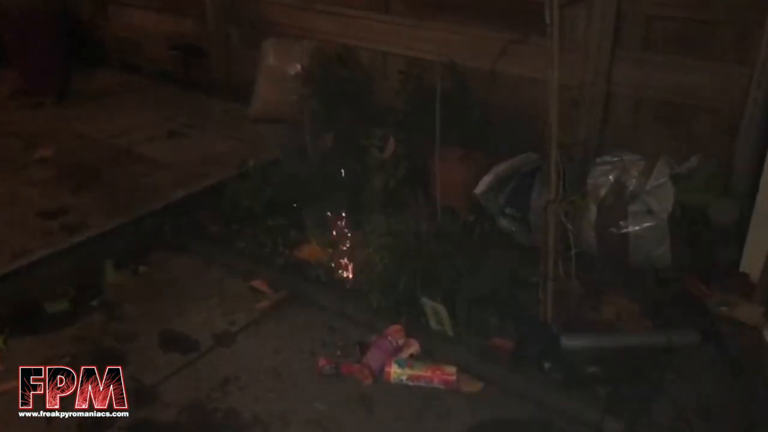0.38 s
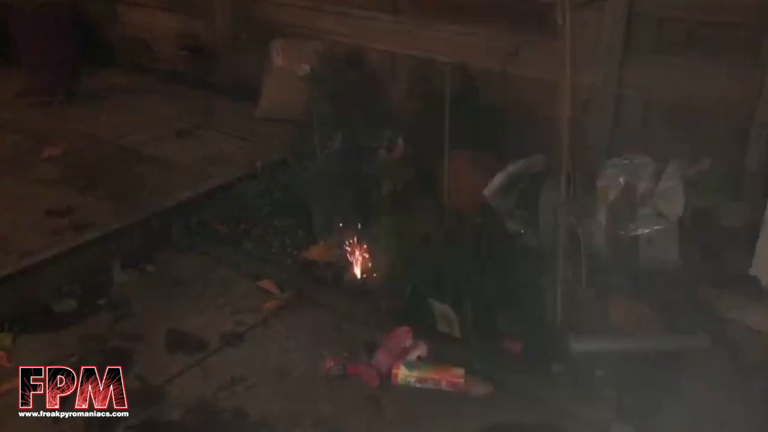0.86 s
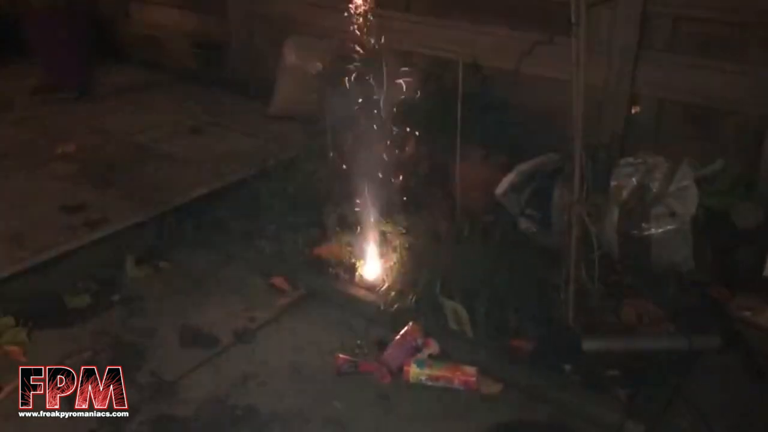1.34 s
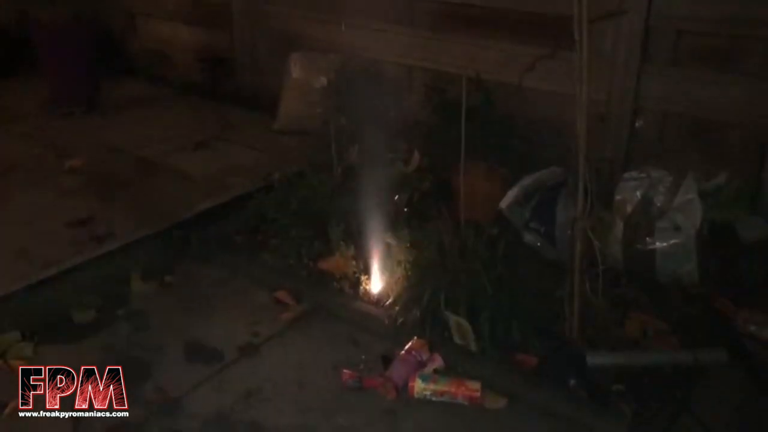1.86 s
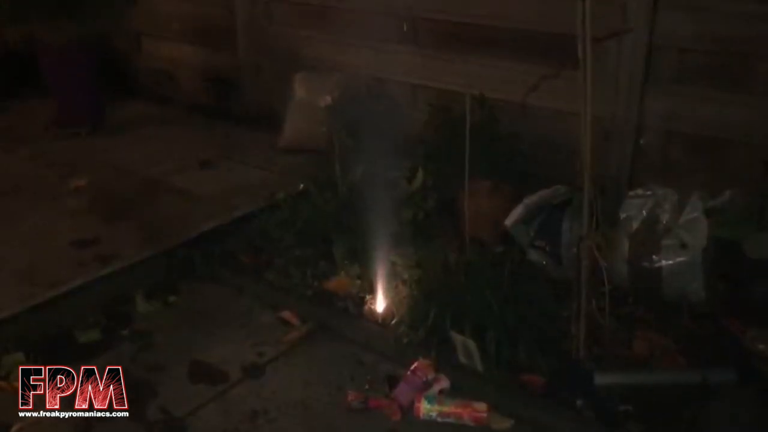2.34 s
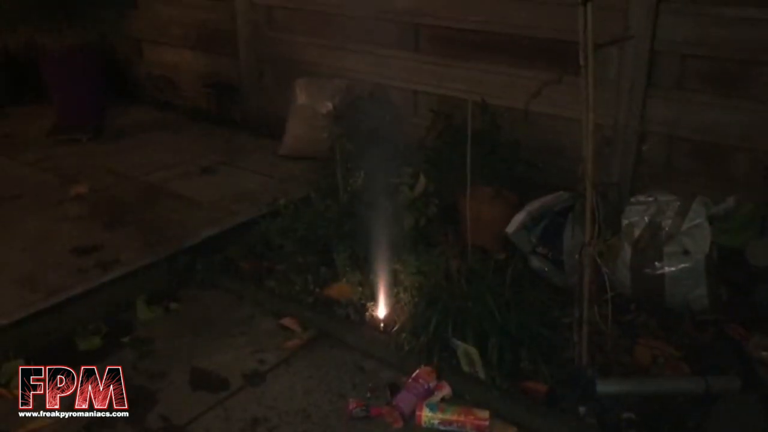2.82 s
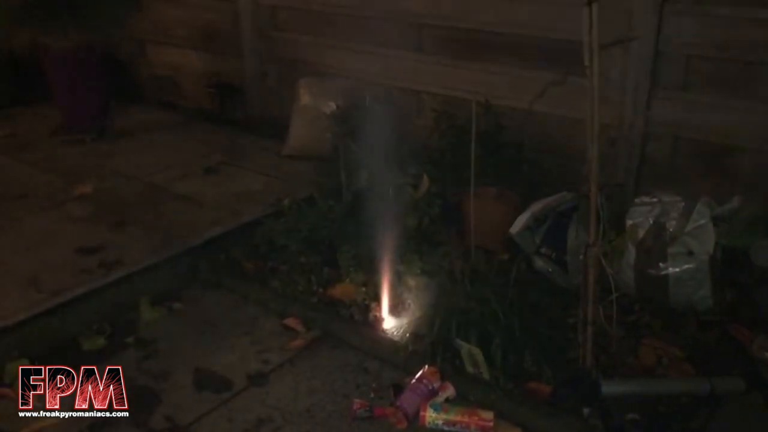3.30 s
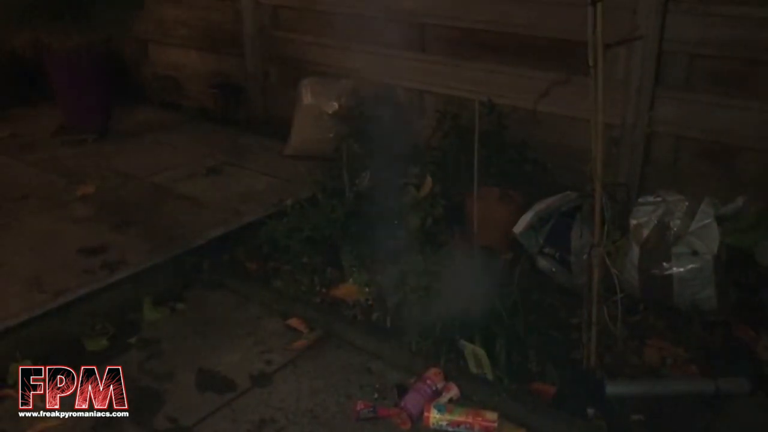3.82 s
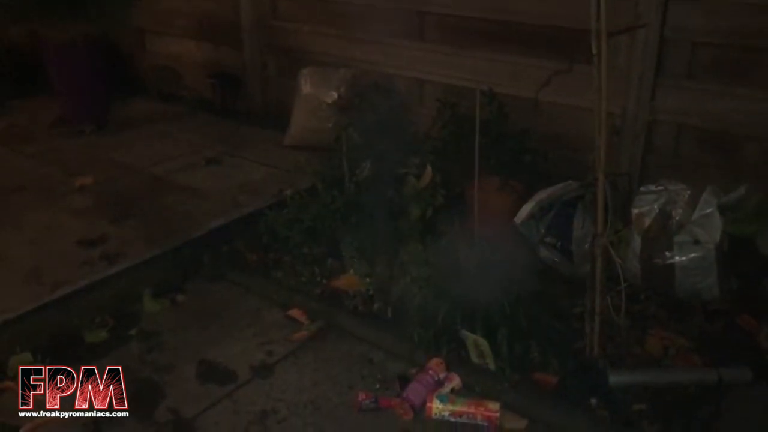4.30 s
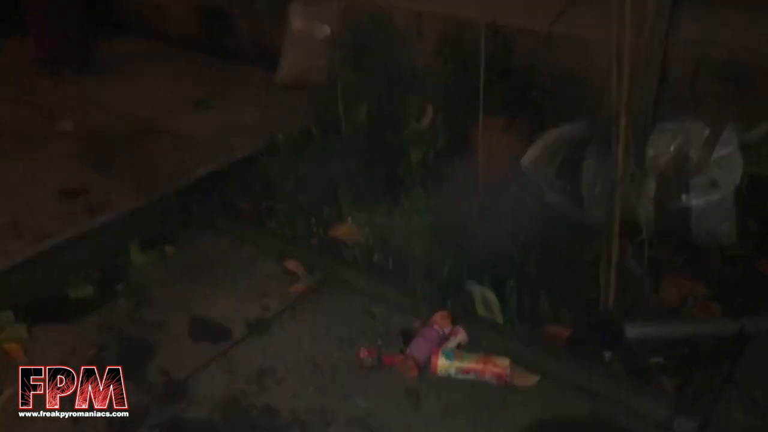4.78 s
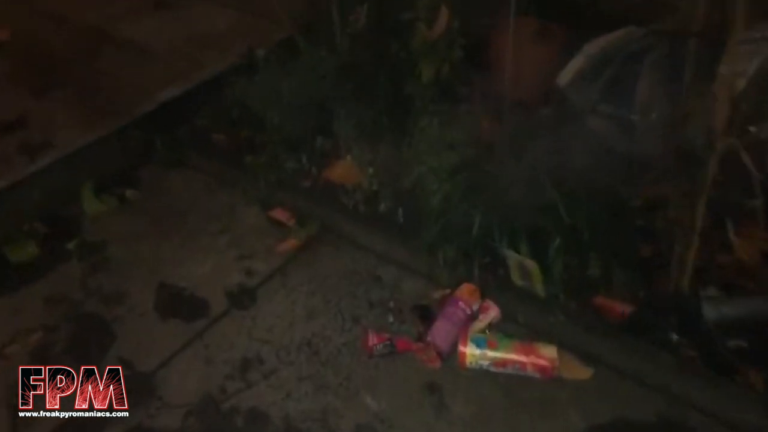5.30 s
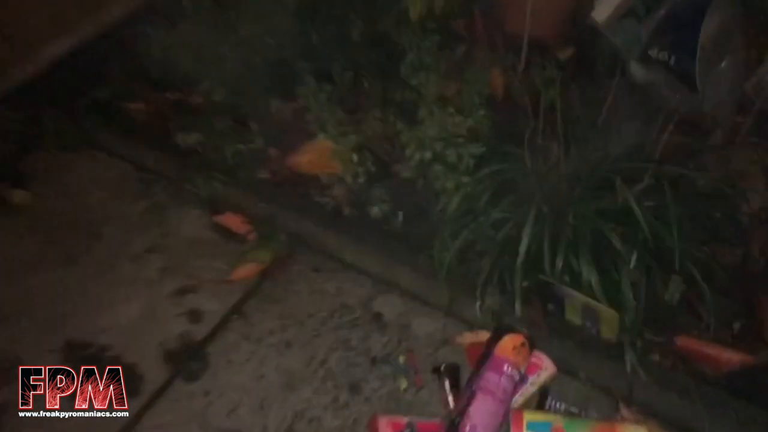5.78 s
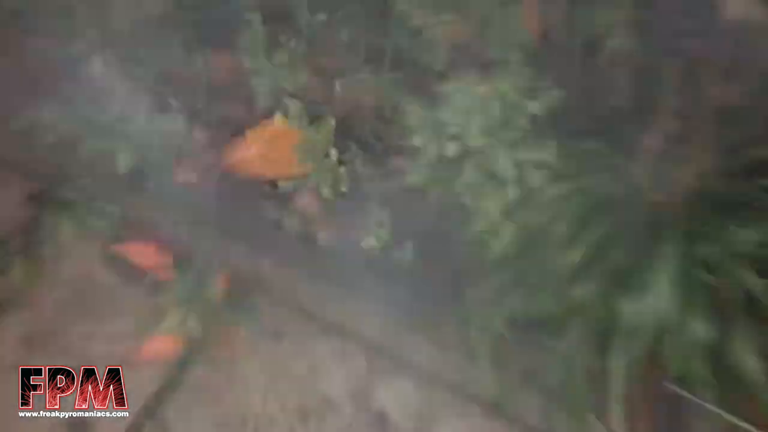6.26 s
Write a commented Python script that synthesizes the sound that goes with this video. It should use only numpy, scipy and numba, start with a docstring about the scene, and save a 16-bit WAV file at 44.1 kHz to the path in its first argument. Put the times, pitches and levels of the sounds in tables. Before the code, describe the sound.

A paved, fenced yard at night, heard through a handheld recorder with automatic gain and dulled top treble. From 0 to 1.2 s a fuse fizzes and spits thinly, with a hollow tube resonance rising slightly, over faint low traffic. At 1.2 s the charge catches with a small pop and a very loud, piercing whistle near 4.7 kHz, rich in overtones, rough and wrapped in jet hiss. It slides down to about 3 kHz by 2.1 s, where it sputters briefly, bottoms around 2.65 kHz at 2.7 s, then climbs to about 4.2 kHz and dies quickly near 3.75 s, with short dense echoes. Near silence follows; background slowly returns, with a faint thin high tone from 4 to 4.9 s and a swelling traffic drone. From 4.9 s footsteps approach: dull thuds, a scrape at 5.6 s, and sharper grit crunches around 6.0 to 6.4 s.

```python
"""A paved yard at night: a small ground firework fizzes on its fuse, resonant in its card tube, then the charge
whistles as a gliding harmonic stack with jet hiss and two sputters. Fences return dense noise-like echoes.
The recorder's gain control ducks and creeps back; a faint thin tone, probably a trace of the recorder's
processing, stops as footsteps begin: the holder walks up over gritty slabs, soles thudding, dragging and
cracking grit. Far off, traffic drones in a narrow band of noise."""
import sys
import numpy as np
from scipy import signal
from scipy.fft import rfft, irfft
from scipy.io import wavfile
from scipy.ndimage import uniform_filter1d, minimum_filter1d
from numba import njit

SR = 44100
rng = np.random.default_rng(int(sys.argv[2]) if len(sys.argv) > 2 else 0)


def voltage_ratio(level):
    """Linear amplitude factor for a level in decibels (scalar or array-like)."""
    return 10 ** (np.asarray(level, float) / 20)


def store_pcm(level_fs):
    """Save levels as 16-bit WAV."""
    pcm = np.round(np.clip(level_fs, -1, 1) * 32767).astype(np.int16)
    wavfile.write(sys.argv[1], SR, np.atleast_2d(pcm).T)


N = 281799
TIME = np.arange(N) / SR
CATCH_S = 0.0022  # how quickly the charge catches, and a sputter sets in


def level(x, db):
    """Scale to an rms level."""
    return x * voltage_ratio(db) / np.sqrt(np.mean(x ** 2))


def columns(table):
    """Each column of a curve table after the first, one value per sample."""
    s, *rest = np.transpose(table)
    return [np.interp(TIME, s, c) for c in rest]


def span(table, fade_s=.004):
    """1 while a table lasts, with short fades outside it."""
    into = TIME - table[0][0] + fade_s
    left = table[-1][0] + fade_s - TIME
    return np.clip(np.minimum(into, left) / fade_s, 0, 1)


def walk(rate):
    """Random levels held 1 / rate s and slewed twice; spread near 1."""
    k = int(SR / rate)
    held = np.repeat(rng.standard_normal(N // k + 1), k)
    return 1.3 * uniform_filter1d(uniform_filter1d(held, k), k)[:N]


def colour(x, points):
    """Shape a sound by (Hz, dB) points; rms 1."""
    hz, db = np.transpose(points)
    bins = np.arange(N // 2 + 1) * SR / N + 1
    gain = voltage_ratio(np.interp(np.log(bins), np.log(hz), db))
    return level(irfft(rfft(x) * gain, N), 0)


def crackle(per_s, spread_db):
    """Noise sprinkled with sharp grains of very uneven size; rms 1."""
    size = voltage_ratio(spread_db * np.minimum(rng.exponential(size=N), 5.5))
    grains = (rng.random(N) < per_s / SR) * size * rng.standard_normal(N)
    return level(rng.standard_normal(N) + uniform_filter1d(grains, size=3), 0)


@njit
def svf(x, hz, width):
    """Moving state-variable band-pass, gain 1 at the centre; hz per sample, width in Hz."""
    y, b, l = np.empty(len(x)), 0., 0.
    for i in range(len(x)):
        g, k = np.tan(np.pi * hz[i] / SR), width / hz[i]
        v = (b + g * (x[i] - l)) / (1 + g * (g + k))
        b, l, y[i] = 2 * v - b, l + 2 * g * v, k * v
    return y


def band(x, hz, width):
    """Two moving band-passes in a row."""
    return svf(svf(x, hz, width), hz, width)


def ring(s, db, hz, cycles):
    """One damped blip that builds over half a cycle; db is its level before build-up and decay."""
    turns = np.clip(TIME - s, 0, None) * hz
    return voltage_ratio(db) * np.sin(2 * np.pi * turns) * np.minimum(2 * turns, 1) * np.exp(-turns / cycles)


def after(s, decay_s):
    """A quick rise to 1 at s, then dying away."""
    return np.clip(1 + (TIME - s) / CATCH_S, 0, 1) * np.exp(-np.abs(TIME - s) / decay_s)


def uneven():
    """Level and steadiness of the half-pitch lines: faint, except in spells when every other pulse differs."""
    # spells: start t/s, end t/s, level/dB at start, level/dB at end, steadiness (0-1)
    spells = [(1.213, 1.27, 1, -3, .3), (2.15, 2.5, -18, -13, .35), (2.52, 2.95, -8, -7, .75),
              (3.18, 3.63, -14, -10, .35)]
    rest_db, edge_db_per_s = -30, 600
    db, steady = np.full(N, 1. * rest_db), np.zeros(N)
    for s, end, first_db, last_db, share in spells:
        steady[TIME > s - .03] = share  # holds until the next spell
        outside = np.maximum(np.maximum(s - TIME, TIME - end), 0)
        spell_db = np.interp(TIME, [s, end], [first_db, last_db])
        db = np.maximum(db, spell_db - edge_db_per_s * outside)
    return db, steady


def whistle():
    """Pulsed burning locks to the tube: a harmonic stack, smeared half-pitch lines and jet hiss."""
    # glide of the whistle: t/s, f/Hz, level/dB of the fundamental
    glide = [(1.191, 4700, -30.5), (1.198, 4786, 21.5), (1.209, 4730, 27), (1.215, 4413, 10.5),
             (1.245, 4323, 15.5), (1.26, 4125, 14.5), (1.3, 4018, 8.5), (1.37, 3863, 12.5),
             (1.45, 3804, 11.5), (1.65, 3579, 12.5), (1.85, 3378, 13.5), (2.085, 3131, 7),
             (2.102, 3570, 8.5), (2.115, 3023, 14.5), (2.14, 2940, 8), (2.3, 2830, 11.5), (2.5, 2729, 7.5),
             (2.7, 2650, 11), (2.8, 2676, 7), (2.88, 2870, 7), (2.94, 2938, 9.5), (2.99, 3183, 5.5),
             (3.09, 3491, 15.5), (3.14, 3836, 6.5), (3.19, 3992, 0), (3.25, 4059, 5), (3.42, 4037, 6.5),
             (3.5, 4100, 14), (3.58, 4221, 8.5), (3.66, 4210, 7.5), (3.72, 4285, 0), (3.755, 4190, 5),
             (3.79, 3985, -11)]
    # overtones: multiple of the pitch, level/dB
    overtones = [(2, -2), (3, -4.5), (4, -1.5)]
    # lines from uneven pulses: multiple of the pitch, level/dB
    half_lines = [(.5, -11), (1.5, 1.5), (2.5, -0.5), (3.5, 6)]
    # spectrum of the jet hiss: f/Hz, level/dB per Hz (relative)
    jet_spectrum = [(40, -39), (100, -19.5), (250, -10.5), (700, -14), (2000, -10.5), (3500, -2.5),
                    (5500, -6), (9000, 2), (12500, 1.5)]
    # sputters of the charge: t/s, low pop's level/dB before build-up and decay, f/Hz, jet burst level/dB
    sputters = [(1.204, -12.5, 220, 0.5), (2.106, -3, 250, -3.5)]
    # overtones and jet share the burn: it catches, sags slowly, then dies out
    catch_at_s, die_from_s, die_db_per_s2 = 1.2, 3.601, 499
    over_start_db, over_sag_db_per_s, over_die = 3, 1.1, 1.3
    jet_start_db, jet_sag_db_per_s, jet_die = -5.5, 1.5, 0.72
    roar_db, roar_sag_db_per_s, roar_width_hz = -11.5, 9, 2200.
    skirt_db, skirt_ratio, skirt_width_hz = -21, 0.87, 540
    top_limit_hz, top_limit_db_per_hz = 11900, 2.1  # the recorder's top limit weakens overtones above it
    steady_pct, shaken_pct, shaken_s = .48, 1.8, 0.078  # pitch wobble, and the extra after a sputter
    burst_s = .012

    hz, db = columns(glide)
    lit = TIME - catch_at_s
    caught = 1 / (1 + np.exp(-np.clip(lit / CATCH_S, -30, 30)))
    die_db = die_db_per_s2 * np.maximum(TIME - die_from_s, 0) ** 2
    unsteady = steady_pct + shaken_pct * sum(after(row[0], shaken_s) for row in sputters)
    phase = 2 * np.pi * np.cumsum(hz * (1 + unsteady / 100 * walk(260))) / SR
    throb = voltage_ratio(2.2 * walk(60) + 1.3 * walk(170))

    tone = voltage_ratio(db) * np.sin(phase)
    over_db = over_start_db - over_sag_db_per_s * lit - over_die * die_db
    for k, part_db in overtones:
        loss_db = top_limit_db_per_hz * np.maximum(k * hz - top_limit_hz, 0)
        gain = caught * voltage_ratio(over_db + part_db - loss_db + 2.2 * walk(60))
        tone = tone + (k * hz < .45 * SR) * gain * np.sin(k * phase)

    # the strong-weak pattern keeps slipping, which smears these lines
    half_db, steady = uneven()
    slip = caught * (steady + (1 - steady) * walk(450)) * voltage_ratio(2.9 * walk(12))
    halves = slip * sum(voltage_ratio(part_db) * np.sin(k * phase) for k, part_db in half_lines)
    halves = halves * voltage_ratio(half_db - 2 * die_db)

    burst = caught * voltage_ratio(jet_start_db - jet_sag_db_per_s * lit - jet_die * die_db)
    burst = burst + sum(voltage_ratio(burst_db) * after(s, burst_s) for s, _, _, burst_db in sputters)
    jet = colour(crackle(2000, 3.), jet_spectrum) * burst * voltage_ratio(1.8 * walk(14) + 1.8 * walk(120))

    # a band of roar between the first two partials
    roar = level(band(rng.standard_normal(N), 1.5 * hz, roar_width_hz), roar_db)
    roar = caught * roar * voltage_ratio(2.5 * walk(25) - roar_sag_db_per_s * lit - die_db)

    # breathy noise just under the tone, more when it wobbles
    skirt = level(band(rng.standard_normal(N), skirt_ratio * hz, skirt_width_hz), skirt_db)
    skirt = caught * skirt * voltage_ratio(2.4 * walk(30) - die_db) * unsteady / steady_pct

    pops = sum(ring(s, pop_db, pop_hz, .6) for s, pop_db, pop_hz, _ in sputters)
    return span(glide) * (np.sqrt(2) * throb * (tone + halves) + jet + roar + skirt) + pops


def fuse():
    """Spitting gas excites two broad resonances of the card tube."""
    end_s, base_db, flare_db, flare_s = 1.3, -49.5, 11, .015  # it flares just as it ends
    # the first resonance climbs as the fuse burns in; the upper one climbs and fades
    tube_hz, tube_end_hz, tube_rise_from_s, tube_rise_s = 3580, 3920, 0.38, 0.58
    upper_hz, upper_end_hz, upper_rise_s = 9900, 10795, 0.83
    upper_db, upper_end_db = 0.5, -9.5  # against the first resonance

    burnt = np.minimum(TIME / end_s, 1)
    low_hz = tube_hz + (tube_end_hz - tube_hz) * np.clip((TIME - tube_rise_from_s) / tube_rise_s, 0, 1)
    high_hz = upper_hz + (upper_end_hz - upper_hz) * np.minimum(TIME / upper_rise_s, 1)
    db = base_db + flare_db * np.exp(-np.abs(end_s - TIME) / flare_s) + 0.72 * walk(23.9)
    gas = crackle(3000, 3.) * voltage_ratio(1.5 * walk(40))
    low = level(band(gas, low_hz, 1200.), 0)
    high = level(band(gas, high_hz, 2100.), 0)
    high_db = upper_db + (upper_end_db - upper_db) * burnt + 3.5 * walk(12)
    return (TIME < end_s) * voltage_ratio(db) * (low + voltage_ratio(high_db) * high + voltage_ratio(-0.5) * gas)


def yard(x):
    """Dense echoes off fences and walls, which beat against the gliding tone, and a faint dull tail from far houses."""
    near_t60_s, near_db, far_t60_s, far_db = .24, -6, .55, -35  # dB: echo energy against the direct sound
    t = TIME[:2 * SR]
    near = rng.standard_normal(len(t)) * (t > .006) * voltage_ratio(-60 * t / near_t60_s)
    dull = uniform_filter1d(rng.standard_normal(len(t)), size=4)
    far = dull * (t > .08) * voltage_ratio(-60 * t / far_t60_s)
    echo = voltage_ratio(near_db) * near / np.linalg.norm(near) + voltage_ratio(far_db) * far / np.linalg.norm(far)
    return voltage_ratio(1.39) * (x + signal.fftconvolve(x, echo)[:N])  # direct and echoes raised together


def steps():
    """Close by, soles thud dully and drag over grit, which cracks in short puffs."""
    # soles land: t/s, level/dB before build-up and decay
    thuds = [(4.8834, -45), (4.953, -44), (5.0212, -41), (5.5853, -29), (5.9851, -35), (6.1373, -27.5),
             (6.2809, -40)]
    # grit cracks underfoot: t/s of the start, peak level/dB, f/Hz
    ticks = [(4.8531, -46, 775), (4.8836, -44, 645), (4.9527, -38, 1313), (5.0212, -25, 5254),
             (5.3683, -39, 800), (5.576, -35, 5404), (5.5853, -37, 449), (5.6402, -30, 2000),
             (5.9243, -47, 3962), (5.9844, -44, 794), (6.0948, -43, 753), (6.1372, -35.5, 645),
             (6.1646, -39, 1900), (6.1741, -33, 10465), (6.2197, -21.5, 10745), (6.2246, -23.5, 6524),
             (6.2338, -27, 1507), (6.24, -31, 1300), (6.246, -27.5, 2583), (6.2796, -33, 1378),
             (6.31, -34, 732)]
    # soles drag on grit: t/s of the peak, level/dB, rise/dB per s, fade/dB per s
    scuffs = [(4.9, -48.5, 300, 200), (5.02, -49.5, 150, 40), (5.37, -63, 300, 150),
              (5.58, -51.5, 600, 150), (5.642, -42, 1500, 97), (5.88, -70, 200, 100), (6.04, -56, 302, 201),
              (6.14, -50, 401, 300), (6.222, -44, 200, 70), (6.39, -50.5, 196, 98)]
    # spectrum of dragged grit: f/Hz, level/dB per Hz (relative)
    grit = [(180, -32), (300, 0.5), (1030, -5.5), (1380, -3), (1810, -7), (10900, -11), (11900, -18),
            (12500, -43), (16200, -72.5), (22000, -120)]
    drag = 0
    for s, db, rise_db, fade_db in scuffs:
        drag = drag + voltage_ratio(db - np.maximum(rise_db * (s - TIME), fade_db * (TIME - s)))
    out = drag * voltage_ratio(1.56 * walk(30)) * colour(crackle(2500, 3.57), grit)
    out = out + sum(ring(s, db, 160.4, 1.55) for s, db in thuds)
    t = TIME[:2048]
    for s, db, hz in ticks:
        centre = np.full(len(t), 1. * hz)
        spit = rng.standard_normal(len(t)) * np.exp(-t / (0.00065 + 2.0 / hz))
        puff = band(spit, centre, 1.7 * hz)
        start = int(s * SR)
        out[start:start + len(t)] += voltage_ratio(db) * puff / np.abs(puff).max()
    return out


def town():
    """Far traffic: a narrow engine drone that swells and fades, over rumble and thin hiss."""
    # spectrum of rumble and hiss: f/Hz, level/dB per Hz (relative)
    distance = [(15, -44), (30, -17), (55, -2), (100, -4), (150, -3.5), (310, -18), (550, -20),
                (1500, -33.5), (4000, -29), (12000, -39.5), (22000, -54)]
    # the drone swells: start t/s, end t/s, gain/dB
    swells = [(0.293, 1.2, 3), (4.7, 5.146, 9)]
    drone_hz, drone_width_hz, drone_db, rumble_db, swell_edge_s = 220., 67, -53, -54, .2
    hz = drone_hz * (1 + .06 * walk(2.9))
    drone = level(band(rng.standard_normal(N), hz, drone_width_hz), 0)
    rumble = colour(rng.standard_normal(N), distance) * voltage_ratio(rumble_db + 1.3 * walk(6))
    swell_db = 0
    for s, end, db in swells:
        swell_db = swell_db + db * np.clip(1 + np.minimum(TIME - s, end - TIME) / swell_edge_s, 0, 1)
    return rumble + drone * voltage_ratio(drone_db + swell_db + 1.9 * walk(10))


def processing_tone():
    """Faint steady sine near 4.2 kHz, probably left by the recorder's processing."""
    # course of the sine: t/s, f/Hz, level/dB
    course = [(4.0, 4170, -63), (4.3, 4208, -60), (4.55, 4240, -60), (4.87, 4230, -69)]
    hz, db = columns(course)
    sine = np.sin(2 * np.pi * np.cumsum(hz) / SR)
    return span(course, 0.018) * np.sqrt(2) * voltage_ratio(db + 2.2 * walk(33)) * sine


def scene():
    """Firework in its yard, footsteps close by, town behind, and the faint processing tone."""
    return (yard(fuse() + whistle()) + steps() + town() + processing_tone())[None]


@njit
def duck(x, start, most, hold, fall):
    """Gain control: follows loud peaks at once, holds, then lets go at a steady dB rate."""
    y, peak, wait = np.empty(len(x)), start, 0.
    for i in range(len(x)):
        if abs(x[i]) >= peak:
            peak, wait = min(abs(x[i]), most), hold
        elif wait > 0:
            wait -= 1
        else:
            peak = max(peak * fall, start)
        y[i] = x[i] * start / peak
    return y


def limit(x, size=200):
    """Smooth peak limiter that looks a few ms around each sample."""
    ceiling = .8
    gain = minimum_filter1d(np.minimum(1, ceiling / (np.abs(x) + 1e-9)), size=2 * size)
    return x * uniform_filter1d(uniform_filter1d(gain, size=size), size=size)


def roll_off(x):
    """The treble ends steeply here."""
    return signal.sosfilt(signal.butter(12, 12890, fs=SR, output="sos"), x)


def record(dry):
    """Gain control, limiter, self-noise and the microphone's band limits."""
    # the recorder's own rumble and hiss: f/Hz, level/dB per Hz (relative)
    self_noise = [(30, -6.5), (60, -3), (250, -3.5), (700, -12), (1500, -18), (4000, -29), (12000, -37)]
    duck_from_db, duck_most_db, hold_s, recover_db_per_s = -20, 27, .62, 10.5
    start = voltage_ratio(duck_from_db)
    x = duck(dry[0], start, start * voltage_ratio(duck_most_db), hold_s * SR, voltage_ratio(-recover_db_per_s / SR))
    x = limit(x)
    x = x + voltage_ratio(-75) * colour(rng.standard_normal(N), self_noise)
    x = signal.sosfilt(signal.butter(2, 40, "high", fs=SR, output="sos"), x)
    x = signal.sosfilt(signal.ellip(10, .5, 80, 11950, fs=SR, output="sos"), x)  # steep top limit in Hz
    return roll_off(x[None])


dry = scene()
out = record(dry)
store_pcm(out)
```